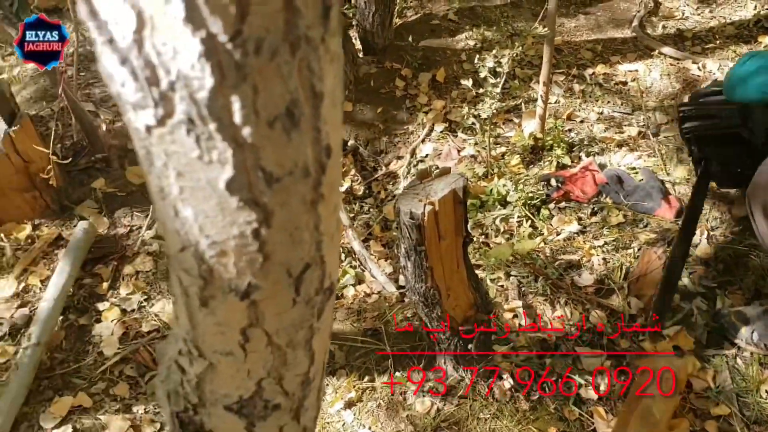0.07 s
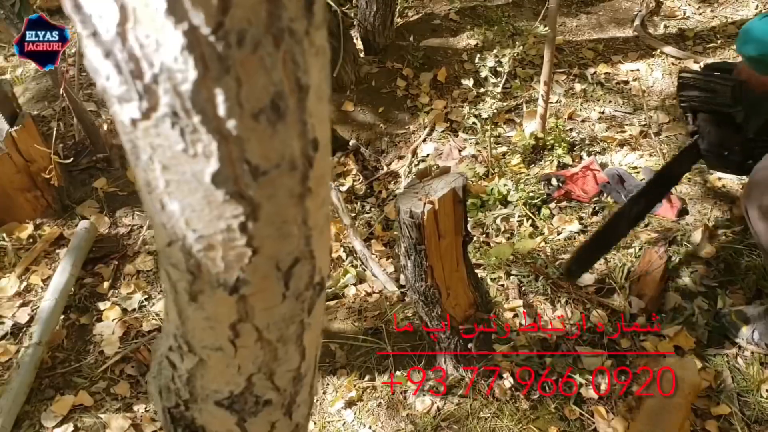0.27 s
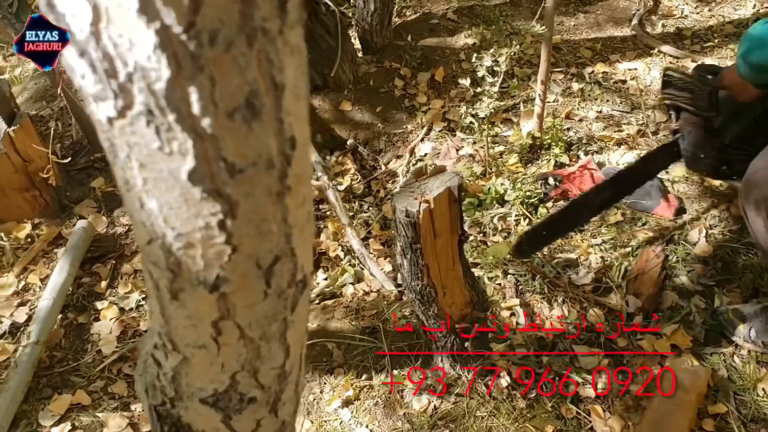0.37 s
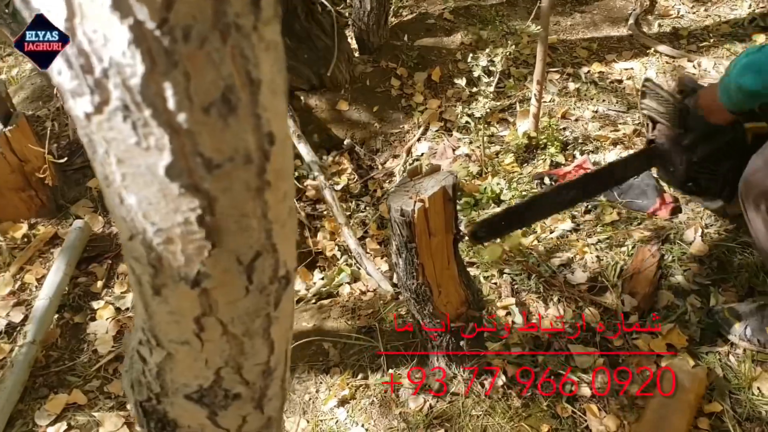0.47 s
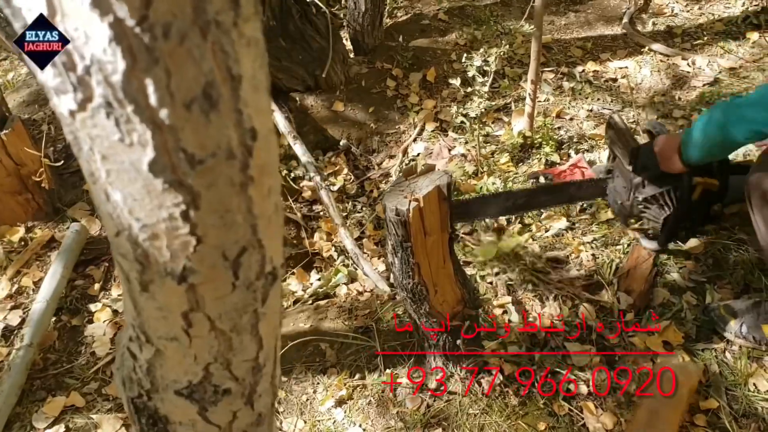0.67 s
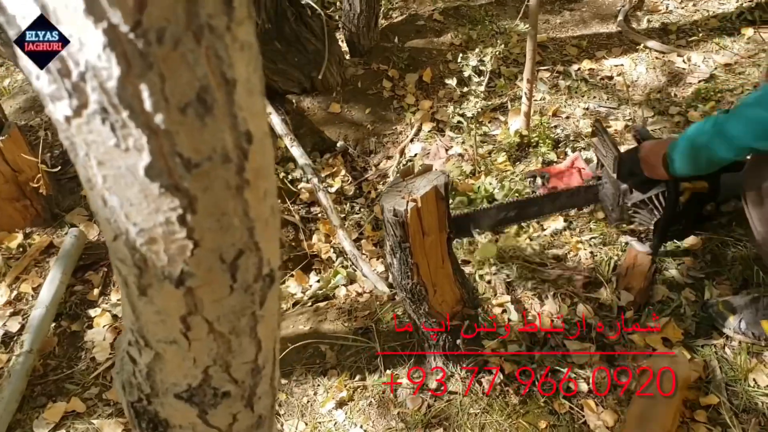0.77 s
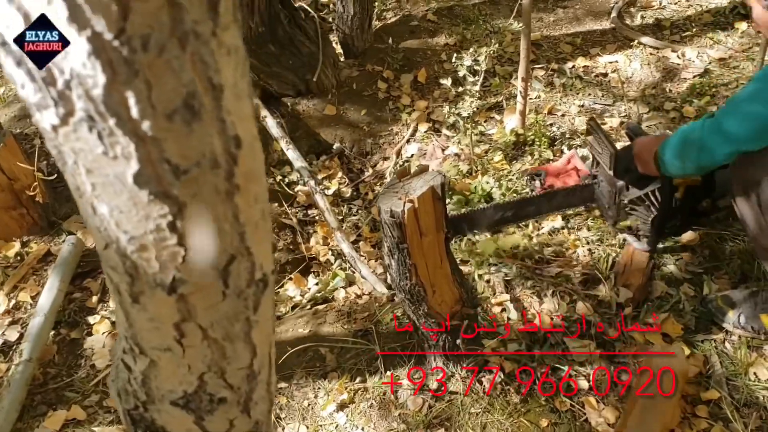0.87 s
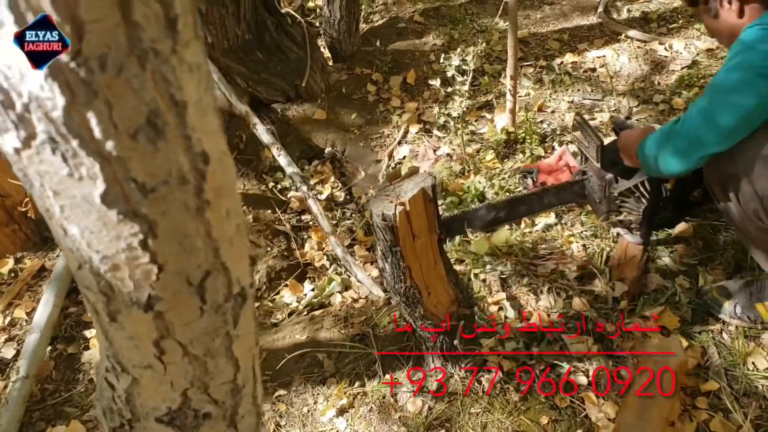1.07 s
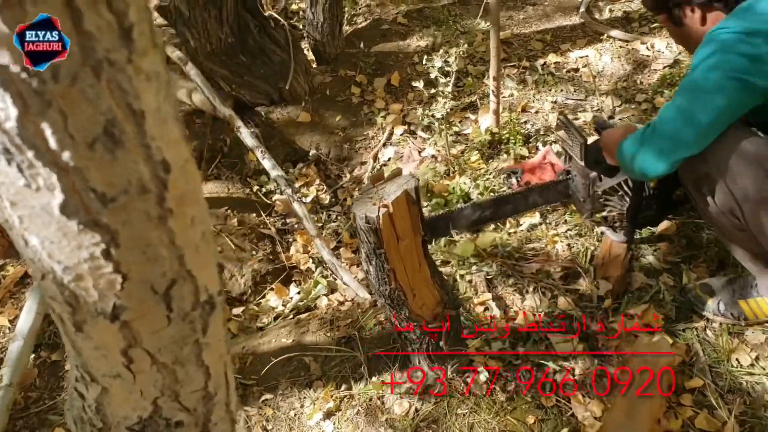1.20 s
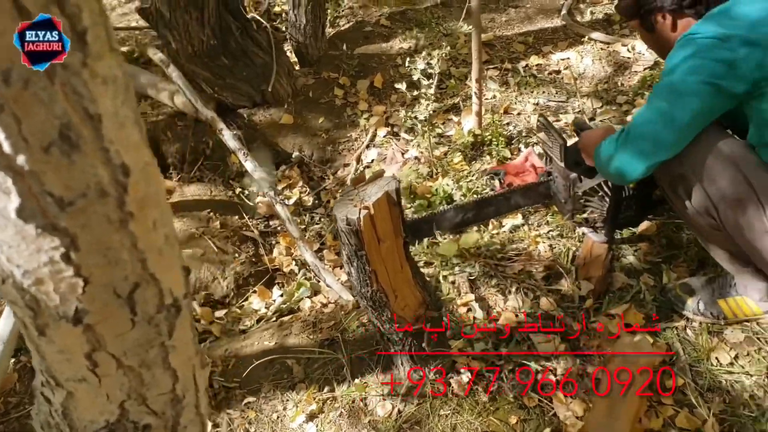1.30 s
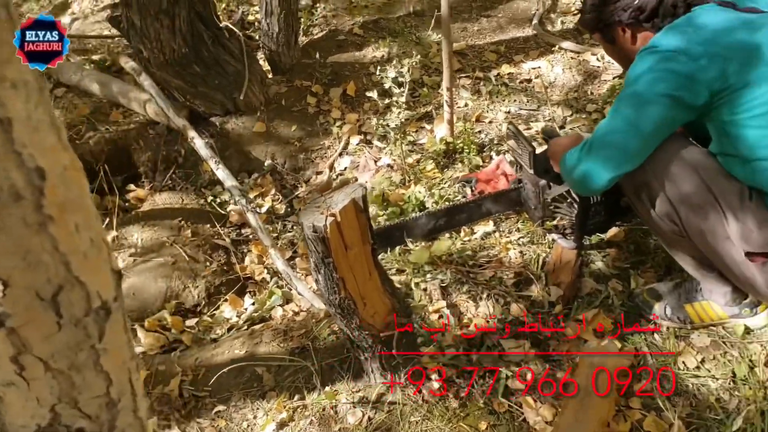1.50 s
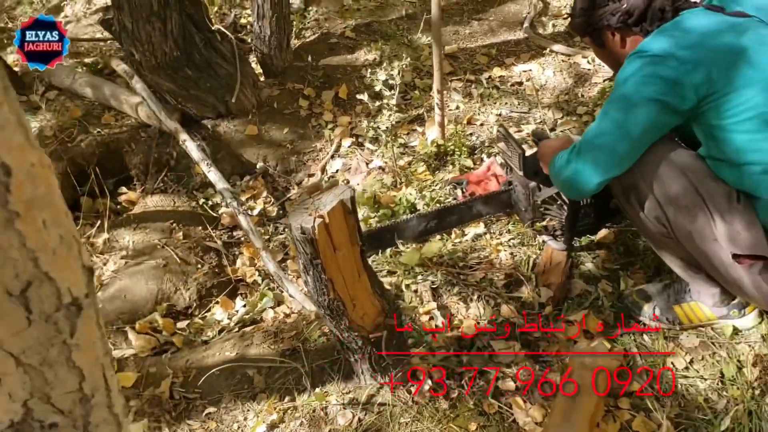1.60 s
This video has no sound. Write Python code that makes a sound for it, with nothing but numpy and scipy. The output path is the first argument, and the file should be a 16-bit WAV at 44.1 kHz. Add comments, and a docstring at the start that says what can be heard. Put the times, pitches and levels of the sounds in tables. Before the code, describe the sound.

A stopped chainsaw's bar knocks on wood, its loose chain rattling as dry leaves crackle.

```python
"""Dry leaves rustle over a low rumble of air as a chainsaw, engine off, is lifted in a wood.
It swings against a stump: a sharp metal clack, then the bar knocks into the ringing wood and the loose
chain chatters. The soil thumps and twigs snap underfoot. The bar scrapes into place, taps lightly and
squeaks as steel sticks and slips on wood. The trees scatter a short echo of the saw."""
import sys
import numpy as np
from scipy import signal
from scipy.fft import rfft, irfft
from scipy.io import wavfile
from scipy.ndimage import map_coordinates

SR = 44100
rng = np.random.default_rng(int(sys.argv[2]) if len(sys.argv) > 2 else 0)


def dump(signal):
    """Clip the signal to [-1, 1] and save it as 16-bit WAV at the path in sys.argv[1]."""
    limited = np.clip(np.atleast_2d(signal).T, -1, 1)
    pcm = np.round(limited * 32767).astype(np.int16)
    wavfile.write(sys.argv[1], SR, pcm)


N = 72765
TIME = np.arange(N) / SR
TOP_HZ = 15850


def undb(db):
    return 10 ** (np.asarray(db) / 20)


def unit(x):
    return x / np.sqrt(np.mean(x ** 2))


def gains(points):
    """Gain at every frequency from (Hz, dB) points."""
    hz, db = np.array(points, float).T
    bin_hz = np.arange(N + 1) * SR / (2 * N)
    return undb(np.interp(np.log(bin_hz + 1), np.log(hz), db))


def colour(x, points):
    """Minimum-phase EQ through (Hz, dB) points."""
    cepstrum = irfft(np.log(gains(points)))
    cepstrum[1:N] *= 2
    cepstrum[N + 1:] = 0
    return irfft(rfft(x, 2 * N) * np.exp(rfft(cepstrum)))[..., :N]


def lowpass(x, hz):
    return signal.sosfilt(signal.butter(3, min(hz, .45 * SR), fs=SR, output="sos"), x)


def highpass(x, hz):
    return signal.sosfilt(signal.butter(3, hz, "high", fs=SR, output="sos"), x)


# Stereo width. Each row: frequency in Hz, each side's own noise against the shared noise in dB.
WIDTH = [(60, -11), (300, -14.5), (800, -0.5), (1600, -2.5), (3500, 0), (8000, 0), (16000, 4)]
def noise(points, grain=1):
    """Coloured stereo noise, narrow in the bass and wide in the treble."""
    parts = rfft(rng.standard_normal((3, N)) * grain, 2 * N)
    spread = gains(WIDTH)
    stereo = irfft((parts[0] + spread * parts[1:]) / np.hypot(1, spread))[:, :N]
    return unit(colour(stereo, points))


def grains(per_s, scatter_db):
    """Sizes of tiny random cracks, a few much louder than the rest."""
    sizes = undb(scatter_db * np.minimum(rng.exponential(size=N), 5))
    return sizes[(TIME * per_s).astype(int)]


def fade(t60):
    return np.exp(-np.log(1000) * TIME / t60)


def attack(seconds):
    return 1 - np.exp(-TIME / seconds)


def swell(centre_s, half_s):
    return np.exp(-((TIME - centre_s) / half_s) ** 2 / 2)


def ride(points):
    return np.interp(TIME, *np.array(points).T)


def at(start, x):
    return np.pad(x, ((0, 0), (int(start * SR), 0)))[:, :N]


def ring(modes):
    return sum(undb(db) * fade(t60) * np.sin(2 * np.pi * hz * TIME) for hz, db, t60 in modes)


# Fader ride of the rustle. Each row: time in seconds, level in dB.
RUSTLE_RIDE = [(0, -32.5), (0.08, -41), (0.14, -50), (0.21, -57), (0.27, -29.5), (0.35, -43.5),
               (0.39, -29.5), (0.5, -31), (0.64, -34), (0.72, -39), (0.82, -32), (0.96, -43), (1.0, -43),
               (1.1, -51.5), (1.17, -49.5), (1.3, -52.5), (1.36, -54), (1.54, -37), (1.65, -35)]
# Crisp leaf tone. Each row: frequency in Hz, gain in dB.
LEAF_EQ = [(300, 3.5), (900, -13.5), (1600, -1), (2600, -7), (4000, 1), (6500, 2), (8000, -8), (9700, -1.5),
           (11500, 6.5), (16000, 3)]
def leaves():
    """Dry leaves crackle under shifting feet."""
    return undb(ride(RUSTLE_RIDE)) * noise(LEAF_EQ, grains(per_s=12000, scatter_db=3))


# Fader ride of the rumble. Each row: time in seconds, level in dB.
RUMBLE_RIDE = [(0, -43), (0.15, -40.5), (0.3, -39.5), (0.5, -51.5), (0.7, -45), (0.82, -35.5), (0.97, -48),
               (1.1, -44), (1.2, -49.5), (1.4, -37.5), (1.55, -44), (1.65, -47.5)]
# Dark rumble and thin hiss. Each row: frequency in Hz, gain in dB.
RUMBLE_EQ = [(20, -42), (35, -8.5), (55, -2), (120, -5), (200, -8.5), (350, -23.5), (700, -33), (2000, -37),
             (6000, -115)]
HISS_EQ = [(100, 4.5), (500, 0.5), (900, 14.5), (1600, -2.5), (2600, -29), (6000, 0), (8000, -43),
           (15000, 1.5)]
def air():
    """Low rumble with a passing hum, a faint outdoor hiss and a puff of wind on the right mic port."""
    hum_hz, puff_hz = 118.1, 51.8
    rumble = undb(ride(RUMBLE_RIDE)) * noise(RUMBLE_EQ)
    hum = undb(-34) * swell(0.029, 0.17) * np.sin(2 * np.pi * hum_hz * TIME)
    puff_eq = [(puff_hz / 2, -24), (puff_hz, 0), (puff_hz * 2, -16), (1200, -60)]
    puff = undb([[-60.5], [-28.5]]) * swell(1.403, 0.066) * noise(puff_eq)
    hiss = undb(-53) * noise(HISS_EQ)
    return rumble + hum + hiss + puff


# Papery brush of the lift. Each row: frequency in Hz, gain in dB.
SWING_EQ = [(500, -10), (1700, -12), (2600, -0.5), (3300, -5), (5000, -2), (6500, -13), (8000, -17),
            (15000, -10)]
def swing():
    """The saw brushes through dry litter as it is lifted."""
    return undb(-39) * swell(0.03, 0.044) * noise(SWING_EQ, grains(per_s=690, scatter_db=2))


def chain_ring(count=200, t60=0.25):
    """Many links jingle, each with its own pitch and decay."""
    links = (np.sin(2 * np.pi * (TOP_HZ * pitch * TIME + phase)) * fade(t60 * 2 ** (life - .5))
             for pitch, phase, life in rng.random((count, 3)))
    return sum(links) / np.sqrt(count)


# Metal hits. Each row: start in seconds, level in dB, low-pass cutoff in Hz.
CLACK_HITS = [(0.219, -7.5, 3040), (0.2275, -9.5, 3000), (0.2325, 2, 17100), (0.2671, -9.5, 3650)]
# Ring of the saw. Each row: frequency in Hz, level in dB, time to fall 60 dB in seconds.
SAW_RING = [(877, -12.5, 0.22), (1440, -4.5, 0.09), (1674, -1, 0.024), (1994, 1.5, 0.053),
            (2580, -1, 0.049), (3375, 2, 0.046), (3600, -11, 0.2), (4200, -13, 0.26), (4700, -4.5, 0.19),
            (4860, -9, 0.12), (5560, -5, 0.13), (6180, -6, 0.18), (6550, -9, 0.17), (6880, -9.5, 0.2)]
# Hard crack and bright jingle. Each row: frequency in Hz, gain in dB.
CRACK_EQ = [(200, 0), (650, -18.5), (950, -1), (1200, -15), (1550, -2), (2500, -3.5), (4500, 5),
            (6500, 2.5), (8000, -16), (11000, -23), (14000, -21), (15000, 1), (16000, -6.5)]
CHAIN_EQ = [(300, -40), (1200, -44), (2000, -12), (3000, -8.5), (6000, -0.5), (8000, -5.5), (11000, 5),
            (13800, 5), (14900, 14), (16000, 3.5)]
def clacks():
    """Metal meets metal: a crack, the saw's ring and a jingle of chain links."""
    links = undb(-13) * colour(np.array([chain_ring(), chain_ring()]), CHAIN_EQ)
    metal = undb(-24) * ring(SAW_RING) + links
    out = 0
    for start, db, cutoff_hz in CLACK_HITS:
        crack = undb(-8) * noise(CRACK_EQ) * fade(t60=0.047)
        out += undb(db) * at(start, lowpass(crack + metal, cutoff_hz))
    return highpass(out, hz=920)


# Bar and chain hit the stump.
# Each row: start in seconds, wood level in dB, wood low-pass cutoff in Hz, chain snap level in dB.
STUMP_HITS = [(0.4288, -31, 1500, -21), (0.4310, -11.5, 1710, -8), (0.4335, -13.5, 3000, 1.5),
              (0.4352, 5, 3500, 0), (0.4408, 0.5, 1730, -9), (0.4470, -2, 1000, -2.5),
              (0.4566, -6.5, 890, -4), (0.4584, -10, 890, -4), (0.4680, -5, 653, -18),
              (0.4763, -11.5, 610, -4.5), (0.4850, -5.5, 698, -18), (0.5475, -35, 900, -18),
              (0.7765, -27, 1530, -7.5), (0.7922, -21, 1470, -8), (0.8212, -40, 900, -13),
              (0.8630, -49, 910, -16.5)]
# Ring of the stump. Each row: frequency in Hz, level in dB, time to fall 60 dB in seconds.
STUMP_RING = [(153.6, -16, 0.58), (202, -10, 0.69), (300, -17, .15), (353.2, -11.5, 0.29),
              (471.8, -6.5, 0.25), (504, -9.5, 0.16), (542, -0.5, 0.2), (660, -17, 0.099),
              (686.6, -0.5, 0.16), (798.6, 6, 0.24), (1083, -19, 0.27), (1201, -2.5, 0.052),
              (1471, 8.5, 0.089)]
# Woody thud and sharp chain snap. Each row: frequency in Hz, gain in dB.
THUD_EQ = [(35, -40), (70, -18.5), (170, -4), (290, 6.5), (380, -21.5), (550, -0.5), (850, 0.5), (1100, -5),
           (1450, -2), (2100, -18.5), (5000, -57)]
SNAP_EQ = [(300, -25), (1200, -9), (2300, -4.5), (4000, 2), (5300, 3.5), (6400, -1), (7800, -11),
           (10000, -5), (13000, 0.5), (16000, -3.5)]
def knocks():
    """Each contact thuds in the stump, duller as the bar settles, and snaps the chain against the bar."""
    stump = undb(-23) * ring(STUMP_RING)
    rattle = undb(-11.5) * fade(t60=0.12)  # loose links chatter on after each snap
    snap_shape = attack(0.00085) * (fade(t60=0.019) + rattle)
    out = 0
    for start, wood_db, cutoff_hz, snap_db in STUMP_HITS:
        thud = undb(-13) * noise(THUD_EQ) * fade(t60=0.063)
        wood = undb(wood_db) * lowpass(stump + thud, cutoff_hz)
        snap = undb(snap_db - 7) * noise(SNAP_EQ) * snap_shape
        out += at(start, wood + snap)
    return out


# The stump rocks, then weight shifts. Each row: centre in seconds, half length in seconds, level in dB.
THUMP_SWELLS = [(0.476, 0.018, -21.5), (0.638, 0.043, -36.5), (0.798, 0.024, -34), (1.289, 0.0077, -49.5)]
# Muffled earth tone. Each row: frequency in Hz, gain in dB.
SOIL_EQ = [(25, -35), (55, -4), (90, -4), (170, -1), (260, -7), (400, -7), (650, -15.5), (1200, -33),
           (4000, -49)]
def thumps():
    """The soil takes the weight with a soft, low thump."""
    weight = sum(undb(db) * swell(centre, half) for centre, half, db in THUMP_SWELLS)
    return weight * noise(SOIL_EQ)


# Ticks in the litter. Each row: start in seconds, level in dB.
TWIG_SNAPS = [(0.516, -18), (0.59, 1), (0.9284, 0), (0.999, -4.5), (1.004, -5), (1.042, -4), (1.102, -19),
              (1.312, -9)]
# Brittle top end. Each row: frequency in Hz, gain in dB.
TWIG_EQ = [(600, -5), (2200, -9), (4500, 3), (6500, 8), (8000, -3), (12000, 7), (16000, 9)]
def twigs():
    """Dry twigs and leaf stalks snap one at a time."""
    shape = undb(-27.5) * fade(t60=0.029)
    return sum(undb(db) * at(start, noise(TWIG_EQ) * shape) for start, db in TWIG_SNAPS)


# The bar slides on wood. Each row: centre in seconds, half length in seconds, level in dB.
SLIDES = [(0.775, 0.058, -35.5), (0.889, 0.012, -38), (1.075, 0.029, -42.5), (1.236, 0.017, -54.5),
          (1.396, 0.05, -38), (1.537, 0.031, -37)]
# Broad rasp. Each row: frequency in Hz, gain in dB.
SCRAPE_EQ = [(150, -17), (400, -3), (800, -0.5), (1600, 1), (2300, -5), (3800, 1), (6500, 3), (7800, -9.5),
             (12000, 4.5), (16000, -53)]
def scrapes():
    """Teeth catch on wood fibres in short gritty slides."""
    effort = sum(undb(db) * swell(centre, half) for centre, half, db in SLIDES)
    return effort * noise(SCRAPE_EQ, grains(per_s=700, scatter_db=1.5))


# Light taps. Each row: start in seconds, level in dB, pitch in Hz.
BAR_TAPS = [(0.742, -3.5, 1490), (0.880, -7.5, 1385), (1.071, -11, 1470), (1.2098, -12, 1625),
            (1.241, -16, 1590), (1.4435, -7, 1325), (1.4472, 0, 1302), (1.5104, -5, 1660)]
# Ring of the wedged bar. Each row: multiple of the pitch, level in dB, time to fall 60 dB in seconds.
BAR_RING = [(1, 1, 0.069), (1.38, -16, 0.17), (3.1, -13, 0.039)]
# Hollow click. Each row: frequency in Hz, gain in dB.
TAP_EQ = [(300, -26), (800, 2.5), (1100, -25), (1310, 4), (1480, 2.5), (1700, 3), (2150, -10), (3200, -17),
          (4000, 1), (4600, -29), (6500, -2.5), (8000, -22), (15000, -10.5)]
def taps():
    """Soft, hollow contacts of the bar in the cut; where it touches sets the pitch of its ring."""
    out = 0
    for start, db, hz in BAR_TAPS:
        bar = undb(-6) * ring([(hz * multiple, mode_db, t60) for multiple, mode_db, t60 in BAR_RING])
        click = noise(TAP_EQ) * fade(t60=0.046)
        out += undb(db - 26) * at(start, attack(0.00088) * (bar + click))
    return out


# Two tiny chirps. Each row: start in seconds, length in seconds, level in dB.
BAR_SQUEAKS = [(1.3385, .029, -36), (1.369, .013, -42)]
def squeaks():
    """Steel sticks and slips unevenly on wood; the pitch falls as the bar stops."""
    from_hz, to_hz, fall_s = 7900, 3700, .0095
    jitter_depth, flutter_db = .034, 3
    hz = to_hz + (from_hz - to_hz) * np.exp(-TIME / fall_s)
    out = 0
    for start, length, db in BAR_SQUEAKS:
        jitter, grip = unit(lowpass(rng.standard_normal((2, N)), hz=470))
        phase = 2 * np.pi * np.cumsum(hz * (1 + jitter_depth * jitter)) / SR
        arch = np.sqrt(np.abs(np.sin(np.pi * np.minimum(TIME / length, 1))))
        tone = np.sin(phase) + undb(-10) * np.sin(2 * phase)
        chirp = undb(db + flutter_db * grip) * arch * tone
        out += at(start, np.array([chirp, chirp]))
    return out


# Tone of the echo, mids scooped. Each row: frequency in Hz, gain in dB.
ECHO_EQ = [(50, -15), (170, 7), (500, -8.5), (900, -9.5), (2000, -16), (6000, -6), (16000, 1.5)]
def tree_echo(x):
    """Trunks scatter an echo that builds up and fades."""
    scatter = noise([(20, 0), (20000, 0)]) * attack(0.088) * fade(t60=0.83)
    response = colour(unit(scatter) / np.sqrt(N), ECHO_EQ)
    return undb(-15.5) * signal.fftconvolve(x, response, axes=1)[:, :N]


# The left port's head start shrinks as the mic turns. Each row: time in seconds, lead in seconds.
MIC_TURN = [(0.95, 0.0003424), (1.12, 0.00003)]
def scene():
    """The saw, its echo and the litter reach the left port slightly early, over a bed of air."""
    saw = swing() + clacks() + knocks() + thumps() + scrapes() + taps() + squeaks()
    left, right = saw + tree_echo(saw) + leaves() + twigs()
    early_left = map_coordinates(left, [(TIME + ride(MIC_TURN)) * SR], order=3, mode="mirror")
    return np.array([early_left, right]) + air()


# Pan across the spectrum. Each row: frequency in Hz, left minus right in dB.
MIC_PAN = [(60, -1), (200, 1.5), (500, 4.5), (1000, 10), (1500, 13.5), (3000, 9.5), (4500, 5.5),
           (6500, 11.5), (8500, 2), (12000, 1), (15000, -2)]
def record(dry):
    """The left port hears more midrange; deep bass is cut, peaks clip at full scale and the top is cut."""
    tilt = np.sqrt(gains(MIC_PAN))
    ports = irfft(rfft(dry, 2 * N) * np.array([tilt, 1 / tilt]))[:, :N]
    clipped = np.clip(highpass(ports, hz=39), -1, 1)
    top_cut = signal.ellip(10, .2, 70, TOP_HZ, fs=SR, output="sos")
    return signal.sosfilt(top_cut, clipped)


dry = scene()
out = record(dry)
dump(out)
```